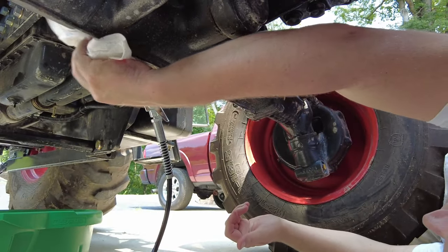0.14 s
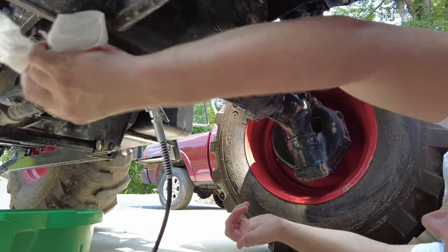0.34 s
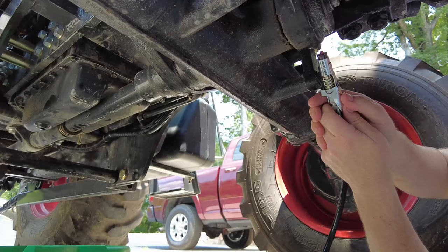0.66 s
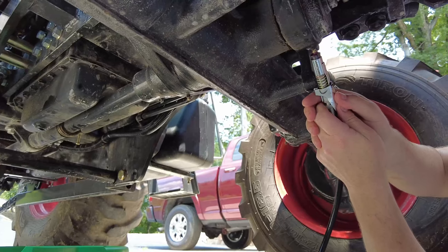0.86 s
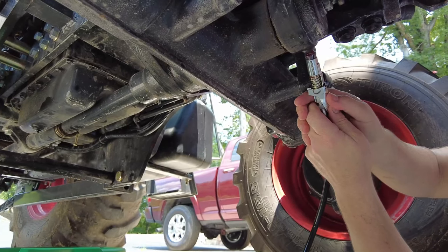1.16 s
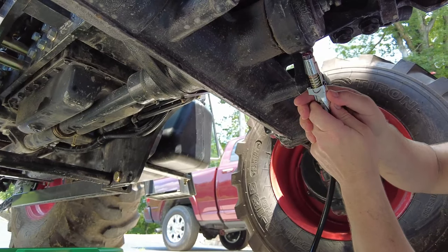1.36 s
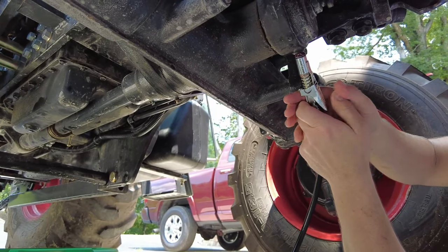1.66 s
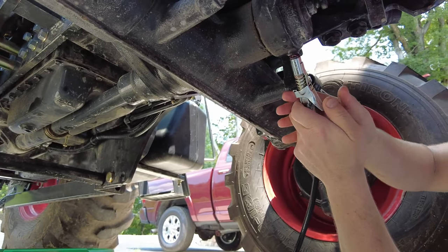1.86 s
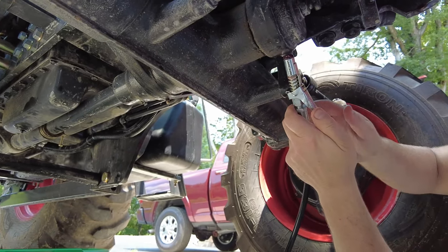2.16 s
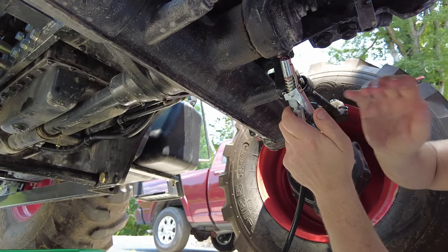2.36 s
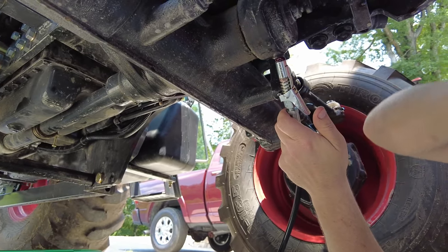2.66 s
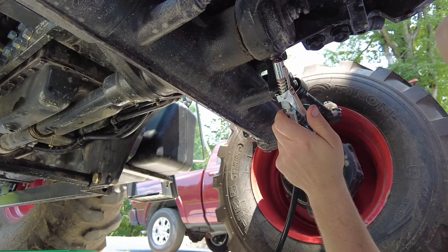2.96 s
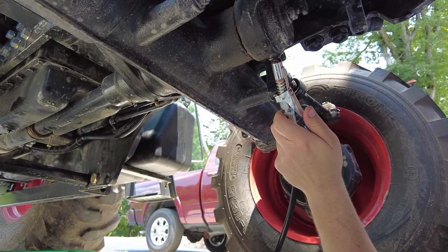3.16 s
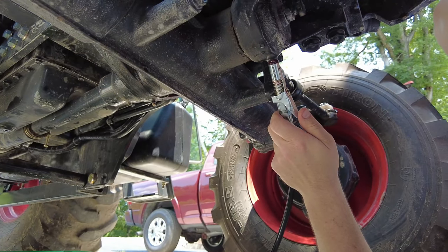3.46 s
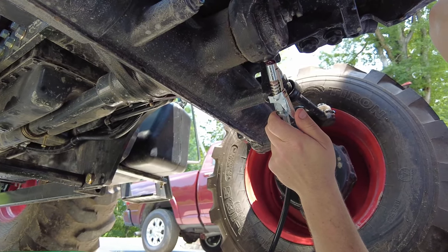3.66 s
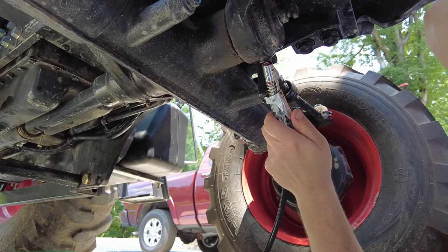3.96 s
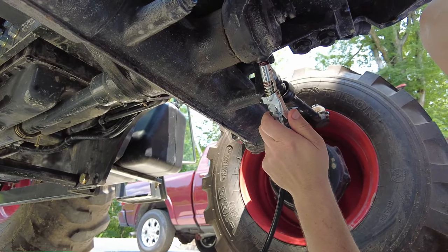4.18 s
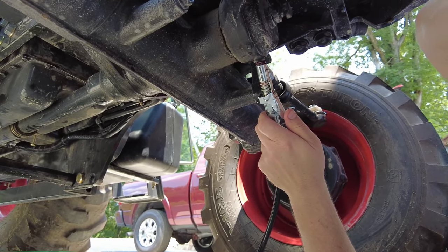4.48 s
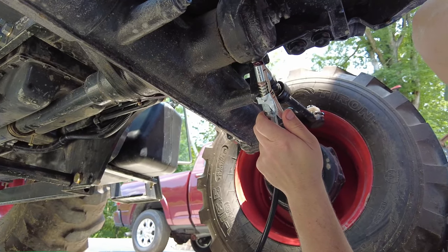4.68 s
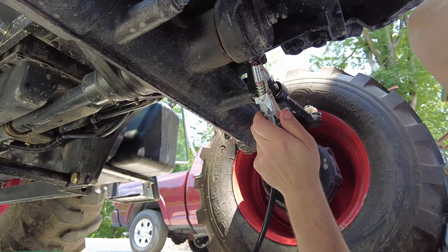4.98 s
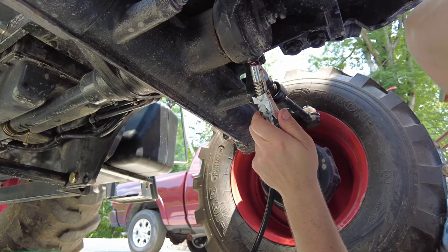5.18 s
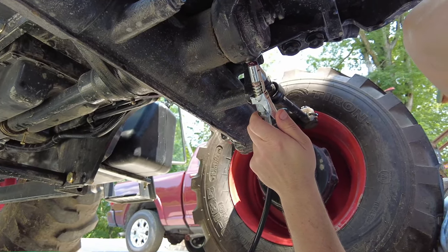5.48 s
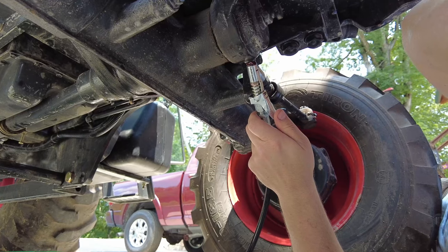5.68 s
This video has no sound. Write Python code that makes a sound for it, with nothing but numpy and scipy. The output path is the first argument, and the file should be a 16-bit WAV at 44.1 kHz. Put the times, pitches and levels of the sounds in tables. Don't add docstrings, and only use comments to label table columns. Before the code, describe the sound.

Brief birdsong and rag rubbing, then metal ticks and a trigger click before an electric grease gun whines, winds down and revs once more.

```python
import sys
import numpy as np
from scipy import signal
from scipy.fft import rfft, irfft, next_fast_len
from scipy.io import wavfile
from scipy.ndimage import uniform_filter1d

SR = 44100
rng = np.random.default_rng(int(sys.argv[2]) if len(sys.argv) > 2 else 0)


def persist_wave(psi):
    counts = np.round(np.clip(psi, -1, 1) * 32767).astype(np.int16)
    wavfile.write(sys.argv[1], SR, np.atleast_2d(counts).T)


def invert_db(level):
    return 10 ** (np.asarray(level, dtype=float) / 20)


N = 256926
T = np.arange(N) / SR
SIZE = next_fast_len(N + SR // 2)
HZ = np.fft.rfftfreq(SIZE, 1 / SR) + 1e-3

# t/s, f/Hz, level/dB
SHAFT_RUN = [(3.23, 46, -58), (3.29, 93.7, -42), (3.38, 138.4, -33), (3.62, 292, -29.5), (3.72, 339, -28),
             (3.79, 353, -27), (3.94, 351.8, -26), (4.06, 331.1, -25), (4.19, 352.9, -27.5),
             (4.535, 352, -26.5), (4.61, 285, -24.5), (4.71, 208.3, -29), (4.87, 162.1, -34.5),
             (5.16, 74.4, -38), (5.3, 138, -34), (5.52, 286.4, -29), (5.66, 327.8, -25), (5.83, 334, -27.5)]
# shaft multiple/1, level/dB
IMBALANCE_ORDERS = [(1, -0.5), (2, -5), (3, 5), (5, 0), (6, 2.5), (7, -4.5), (14, -18), (15, -3)]
# shaft multiple/1, level/dB
PUMP_GROAN = [(2.38, -7.5)]
# shaft multiple/1, level/dB
TOOTH_MESH = [(7.8, -7), (8.9, 5), (10.25, 13), (20.5, -27)]
# shaft multiple/1, level/dB
COMMUTATOR_ORDERS = [(12, 6.5), (24, -7.5), (25, -22), (36, -32), (40, -25), (41, -31), (42, -37)]
# t/s, load/0-1, width/s
PUMP_STROKES = [
    (4.06, 0.66, 0.085),
    (4.6, 0.45, 0.074),
    (5.62, 0.41, 0.057),
    (5.81, 0.73, 0.063),
]
# f/Hz, width/Hz, level/dB
SHELL_MODES = [(1610, 220, -2), (2280, 450, 0), (2800, 460, 1.5), (3247, 350, -4.5), (3642, 220, -1.5),
               (4010, 150, 0.5), (4270, 220, 1.5)]
# f/Hz, level/dB per Hz
HOUSING_COLOUR = [(100, -18.5), (400, -11.5), (900, -8.5), (1300, -14.5), (1900, -12), (2500, -2.5),
                  (3300, 0), (3900, 0.5), (4500, -3), (6200, -11), (7000, -19.5), (9500, -21),
                  (11800, -26.5), (13000, -22.5)]
# f/Hz, width/Hz, level/dB
HOUSING_RINGS = [(1554, 57, 16), (1720, 100, 4.5), (2160, 86, -1), (2745, 20, 4.5), (3170, 70, -15),
                 (3320, 58, -2.5), (5610, 76, -36), (6500, 160, -8)]
FULL_SPEED_HZ = 350
HUM_DB, IMBALANCE_DB, MESH_DB, COMMUTATOR_DB, OVERTONE_DB = -18.5, -15.5, -6, -1.6, -4.5
LOAD_HUM_DB, LOAD_IMBALANCE_DB, LOAD_MESH_DB = 6.5, -6.5, -1
LOAD_COMMUTATOR_DB, LOAD_OVERTONE_DB = -20, -5
TREBLE_DB, TREBLE_DB_PER_SPEED = -5, 15
RUN_UP_DB, RUN_UP_HZ_PER_S = -13, 560
GLIDE_MESH_DB = -2.5
SECOND_FILL_S, SECOND_FILL_DB = 5.3, 11.5


def motor():
    gate, (hz, db) = curves(SHAFT_RUN, .01)
    level = np.where(T > 5, 1, gate) * invert_db(db + .1)
    hz = uniform_filter1d(hz, size=SR // 30)
    speed = hz / FULL_SPEED_HZ
    load = sum(share * np.exp(-((T - s) / width) ** 2) for s, share, width in PUMP_STROKES)
    hum_db = HUM_DB + LOAD_HUM_DB * load
    gaining = np.gradient(hz) * SR / RUN_UP_HZ_PER_S
    blur_db = RUN_UP_DB * np.clip(gaining, 0, 1) * np.clip(1 - speed, 0, 1)
    glide = np.clip(3 * abs(gaining), 0, 1)
    turns = np.cumsum(hz * (1 + 0.00089 * walk(60))) / SR

    shake = invert_db(IMBALANCE_DB + LOAD_IMBALANCE_DB * load) * speed ** 2.4
    tones = shake * partials(turns, IMBALANCE_ORDERS, 3.5)
    groan = invert_db(1.48 * hum_db - 0.5 + SECOND_FILL_DB * (T > SECOND_FILL_S)) * speed
    tones += groan * partials(turns, PUMP_GROAN, 7.4)
    overtone = invert_db(OVERTONE_DB + LOAD_OVERTONE_DB * load - 4.5)
    overtone = overtone * np.clip(speed / 0.65, 0, 1) ** 3 / speed ** 2.1
    tones += overtone * partials(turns, COMMUTATOR_ORDERS[1:], 3.1)

    mesh = invert_db(MESH_DB + LOAD_MESH_DB * load + GLIDE_MESH_DB * glide - 7.0) * speed ** 1.7
    gears = mesh * partials(turns, TOOTH_MESH, 2.3)
    brushes = invert_db(COMMUTATOR_DB + LOAD_COMMUTATOR_DB * load + blur_db - 3.0) * speed ** 0.68
    gears += brushes * partials(turns, COMMUTATOR_ORDERS[:1], 2.37)
    shell = invert_db(-32) + sum(resonances([mode]) ** 2 / invert_db(mode[2]) for mode in SHELL_MODES)
    tones = level * tones + shape(level * gears, shell)

    rattle = level * teeth(turns, TREBLE_DB - TREBLE_DB_PER_SPEED * (1 - speed), hum_db)
    return space(tones + invert_db(-0.5) * chopper(), 0.049, -8.5) + rattle


def teeth(turns, treble_db, hum_db):
    size = invert_db(1.4 * walk(900) + .8 * walk(30)) * (1 + .06 * np.sin(2 * np.pi * turns))
    direct, *scattered = rfft(rng.standard_normal((3, N)) * size, SIZE)
    echo = invert_db(along(ECHO_COLOUR) - 4.0)
    body = invert_db(along(HOUSING_COLOUR)) * (1 + resonances(HOUSING_RINGS))
    impacts = (direct + echo * np.array(scattered)) / np.sqrt(1 + echo ** 2) * body
    high, mid = above(5190), above(840)
    bands = (1 - mid, mid * (1 - high), high)
    low, middle, treble = (unit(irfft(impacts * band, SIZE)[:, :N]) for band in bands)
    return middle + invert_db(treble_db + 1.0) * treble + invert_db(hum_db + 0.5) * low


def partials(turns, orders, flutter_db):
    out = np.zeros(N)
    turning = turns[3 * SR:]
    for k, db in orders:
        gain = invert_db(db + flutter_db * walk(39.92, size=len(turning)))
        out[-len(turning):] += gain * np.sqrt(2) * np.sin(2 * np.pi * k * turning + k * k)
    return out


# t/s, length/s, level/dB
CHOPPED_STARTS = [
    (3.225, 0.47, -31.5),
    (5.152, 0.49, -33),
]
# overtone/1, level at the start/dB
WINDING_OVERTONES = [(2, 0), (3, -11), (4, -23), (5, -37)]
CHOPPER_HZ, SWELL_S, FADE_S = 2060, 0.1, 0.19


def chopper():
    out, phase = 0, 2 * np.pi * CHOPPER_HZ * T
    overtones = sum(invert_db(g) * np.sin(k * phase) for k, g in WINDING_OVERTONES)
    for (s, length, top_db), bite_db in zip(CHOPPED_STARTS, (.5, -14)):
        end = s + length
        gate, (db,) = curves([(s, -10), (s + SWELL_S, -1.5), (end - FADE_S, 0), (end, -16)], 0.0055)
        fading = invert_db(bite_db - 136 * np.clip(T - s, 0, 1))
        out = out + gate * invert_db(db + top_db) * np.sqrt(2) * (np.sin(phase) + fading * overtones)
    return out


# t/s, peak level/dB, ring f/Hz, treble level/dB rel, left minus right/dB
HAND_CLICKS = [(0.699, -52, 1630, -18, 4), (0.717, -40, 1770, -20, 9), (0.991, -43.5, 765, -29, 3),
               (1.193, -39, 3150, -1, .1), (1.971, -40, 1460, -8, 4), (2.978, -31.5, 2350, -35, -5),
               (2.983, -28, 1780, -42, 0), (3.116, -41.5, 1600, -28, -0.6), (3.172, -39, 2410, -11, -2.5),
               (3.202, -32, 1620, 9, -7), (3.222, -34, 2060, -21, 2.5), (5.130, -33.5, 3260, 13.5, -5.5)]
# t/s, peak level/dB
PLUNGER_KNOCKS = [(4.084, -27.5), (4.139, -31), (4.77, -32.5), (5.139, -35.5), (5.794, -25.5)]


def clicks():
    out = np.zeros((2, N))
    t = T[:SR // 8]
    blows = [(*row, 0.069) for row in HAND_CLICKS]
    blows += [(s, db, 504, -30, -.6, 0.14) for s, db in PLUNGER_KNOCKS]
    for s, db, hz, treble_db, pan_db, t60 in blows:
        noise = rng.standard_normal((3, len(t)))
        ring = bandpass(noise[0], 1, hz * .85, hz * 1.2)
        snap = bandpass(noise[1], 2, hz * .5, hz * 2.5)
        crack = bandpass(noise[2], 1, 4000, 13000)
        blow = 0.9 * unit(ring) * invert_db(-60 * t / t60)
        blow += (.5 * unit(snap) + invert_db(treble_db + 8.0) * crack) * invert_db(-60 * t / (0.2 * t60))
        add(out, blow * invert_db(db - 8.5), s, pan_db)
    return out


# t/s, peak level/dB, left minus right/dB
COUPLER_TICKS = [
    (1.8798, -29.5, 5),
    (1.8852, -31, -2),
    (1.8888, -34, 4),
    (1.9693, -45, -1),
]
# f/Hz, level/dB, t60/s
COUPLER_MODES = [(1330, -17, 1.7), (3310, -17, 0.12), (5440, -2, 0.077), (5491, 7.5, 0.023),
                 (6940, -2.5, 0.095), (8920, -28, 0.079), (10700, -8, 0.027), (13220, -16, 0.07),
                 (14210, -1, 0.03)]


def coupler():
    out = np.zeros((2, N))
    t = T[:SR // 8]
    for s, db, pan_db in COUPLER_TICKS:
        ring = 0
        for hz, mode_db, t60 in COUPLER_MODES:
            decay = invert_db(mode_db - 60 * t / min(t60, .06))
            ring = ring + decay * np.sin(2 * np.pi * hz * t + rng.uniform(0, 2 * np.pi))
        crack = 0.55 * rng.standard_normal(len(t)) * invert_db(-60 * t / 0.019)
        add(out, (ring + crack) * invert_db(db - 10.5), s, pan_db)
    return out


# t/s, length/s, level/dB, ring level/dB rel, low ring level/dB rel
RAG_RUBS = [(0, 0.18, -70.5, 14.5, 4), (0.123, .2, -67, 10.5, -11), (0.316, 0.18, -78, 20, 11),
            (0.477, 0.17, -81.5, 27, 22.5), (0.696, 0.0394, -60, 12.5, 7.5),
            (1.192, 0.053, -63.5, 7.5, -12), (1.37, 0.1, -74.5, 10.5, 1), (1.657, .18, -64.5, 5, -6),
            (2, 0.15, -77.5, 15, -6), (2.85, 0.16, -53, -8.5, -17), (2.968, 0.13, -64.5, 3.5, -3)]
RUB_PEAKS = [0.49, 0.43, 0.69, 0.49, 0.89, .05, 0.44, 0.72, 0.28, 0.11, .1]
# f/Hz, width/Hz, level/dB
CHASSIS_MODES = [(521, 15, 0), (900, 26, -9), (1370, 77, -2.5), (1780, 22, 3.5), (2900, 930, -10.5)]


def rub():
    slips = rng.standard_normal(N) * invert_db(1.7 * walk(300) + 1.1 * walk(25.2))
    ring = unit(shape(slips, resonances(CHASSIS_MODES[1:])))
    low = unit(shape(slips, resonances(CHASSIS_MODES[:1])))
    hiss = unit(shape(slips, above(3200) * ((HZ / 5000) ** -.4 + 0.53 * above(14000))))
    out = 0
    for (s, length, db, ring_db, low_db), peak in zip(RAG_RUBS, RUB_PEAKS):
        stroke = hiss + invert_db(ring_db) * ring + invert_db(low_db) * low
        out = out + swell(s, length, peak, -12, .0024) * invert_db(db) * stroke
    return out


# t/s, length/s, first f/Hz, middle f/Hz, last f/Hz
BIRD_NOTES = [(0.026, 0.04, 3160, 2920, 3690), (0.059, .08, 3130, 3140, 3420),
              (0.206, 0.041, 4130, 3520, 2940), (0.249, 0.036, 2550, 3245, 2440),
              (0.359, 0.13, 4100, 3130, 2800), (0.541, .032, 3430, 3610, 3770),
              (.575, .024, 3620, 3070, 2660), (0.609, 0.084, 2500, 3030, 3210),
              (.705, .02, 2750, 2600, 2550)]
# level/dB, warble depth f/Hz
NOTE_VOICES = [(-48.5, 40), (-49.5, 400), (-55, 60), (-46, 90), (-49, 260), (-56, 80), (-49, 80), (-48, 25),
               (-50, 60)]


def bird():
    out, t = np.zeros(N), T[:SR]
    warble = np.sin(2 * np.pi * 95 * t + 1.55 * walk(29.9, size=SR))
    flutter_db = 2.8 * walk(121.5, size=SR)
    for (s, length, *pitch_hz), (db, warble_hz) in zip(BIRD_NOTES, NOTE_VOICES):
        hz = np.interp(t, [s, s + length / 2, s + length], pitch_hz)
        phase = 2 * np.pi * np.cumsum(hz + warble_hz * warble) / SR
        breath = swell(s, length, 0.58, -8.5, 0.003)[:SR]
        out[:SR] += breath * invert_db(db + flutter_db) * np.sqrt(2) * np.sin(phase)
    return out


# f/Hz, level/dB per Hz
YARD_COLOUR = [(20, 2), (55, -1), (100, -8), (200, -9.5), (300, -18), (500, -16.5), (750, -21),
               (1300, -24.5), (1750, -24), (2200, -32), (4000, -35), (7000, -43), (11500, -55),
               (15000, -50)]
# f/Hz, share/0-1
PORT_LIKENESS = [(25, 0.89), (60, 0.94), (300, 0.97), (700, 0.1), (1500, 0.9), (3000, 0.1), (15000, 0)]
# f/Hz, level/dB
MACHINE_TONES = [(59.2, -59.5), (306.8, -67.5), (360.7, -71.5), (500.6, -68.5)]


def yard():
    like = np.clip(along(PORT_LIKENESS), 0, 1)
    a, b = rfft(rng.standard_normal((2, SIZE))) * invert_db(along(YARD_COLOUR))
    pair = np.array([a, like * a + np.sqrt(1 - like ** 2) * b])
    out, common = 0, walk(0.74)
    for hz in 20 * 4. ** np.arange(6):
        band = np.clip(1 - abs(np.log2(HZ / hz)) / 2, 0, 1)
        out = out + invert_db(1.4 * common + 0.98 * walk(4.54)) * irfft(pair * band, SIZE)[:, :N]
    tones = 0
    for hz, db in MACHINE_TONES:
        tones = tones + invert_db(db - 2.5 + 2.1 * walk(3.21)) * np.sqrt(2) * np.sin(2 * np.pi * hz * T)
    return unit(out) * invert_db(-53.5) + tones


# f/Hz, echo over direct level/dB
ECHO_COLOUR = [(100, -3), (500, -10.5), (880, -12), (1100, 0), (2500, -0.5), (5000, 1.5), (8000, 6),
               (15000, 13)]


def space(x, t60, wet_db):
    t = T[:SR // 2]
    tail = rng.standard_normal((2, len(t))) * invert_db(-60 * t / t60) * (t > .002)
    tail /= np.sqrt(np.sum(tail ** 2, axis=1, keepdims=True))
    echo = invert_db(along(ECHO_COLOUR) + wet_db)
    return shape(x, (1 + echo * rfft(tail, SIZE)) / np.sqrt(1 + echo ** 2))


# f/Hz, lead/rad
RIGHT_LEAD = [(200, 0.5), (500, 1.66), (820, 3.5), (950, 3.5), (1080, 4), (1300, 8), (1500, 7), (2300, 8),
              (3700, 9.0), (4250, 8.5), (4800, 9.5), (6500, 11), (8500, 13), (11000, 14), (15000, 17)]
# f/Hz, right over left level/dB
RIGHT_GAIN = [(60, 1.5), (300, 0.15), (2500, 1.5), (3600, 1), (3900, -5), (4300, 3), (5000, 2), (6500, 1.4),
              (10500, 3.5), (13000, 3), (14500, 8)]


def ports(pair, aside):
    lead = np.exp(1j * aside * along(RIGHT_LEAD))
    return np.array([pair[0], shape(pair[1], invert_db(aside * along(RIGHT_GAIN)) * lead)])


def unit(x):
    return x / np.sqrt(np.mean(x ** 2))


def along(points):
    hz, value = np.transpose(points)
    return np.interp(np.log(HZ), np.log(hz), value)


def resonances(modes):
    return sum(invert_db(db) / np.sqrt(1 + (2 * (HZ - hz) / width) ** 2) for hz, width, db in modes)


def shape(x, gain):
    return irfft(rfft(x, SIZE) * gain, SIZE)[..., :N]


def above(hz):
    return 1 / (1 + (hz / HZ) ** 6)


def bandpass(x, order, low_hz, high_hz):
    return signal.sosfilt(signal.butter(order, [low_hz, high_hz], "band", fs=SR, output="sos"), x)


def curves(table, fade_s):
    s, *columns = np.transpose(table)
    gate = np.clip(np.minimum(T - s[0], s[-1] - T) / fade_s, 0, 1)
    return gate, [np.interp(T, s, c) for c in columns]


def swell(s, length, peak, edge_db, fade_s):
    top_s = s + np.clip(peak, .02, .98) * length
    gate, (db,) = curves([(s, edge_db), (top_s, 0), (s + length, edge_db)], fade_s)
    return gate * invert_db(db)


def walk(rate, size=N):
    place = np.arange(size) * rate / SR
    knots = rng.standard_normal(int(place[-1]) + 2)
    return 1.087 * np.interp(place, np.arange(len(knots)), knots)


def add(out, sound, s, pan_db):
    i = int(s * SR)
    piece = sound[:N - i]
    out[:, i:i + len(piece)] += piece * invert_db([[pan_db / 2], [-pan_db / 2]])


def scene():
    touch = space(clicks() + coupler() + rub(), 0.05, -15.5)
    song = space(invert_db(1.5) * bird(), .4, -4.0) * (T < .737)
    return ports(motor() + yard(), 0.97) + ports(touch + song, 0.15)


def band_limit(x):
    return signal.sosfilt(signal.butter(12, 17010, fs=SR, output="sos"), x)


def record(dry):
    mix = shape(dry, 1 / (1 + (HZ / 15800) ** 300))
    return band_limit(mix)


dry = scene()
out = record(dry)
persist_wave(out)
```